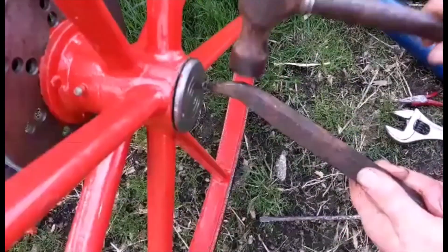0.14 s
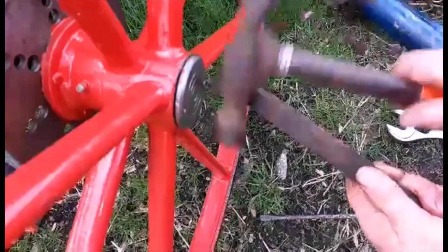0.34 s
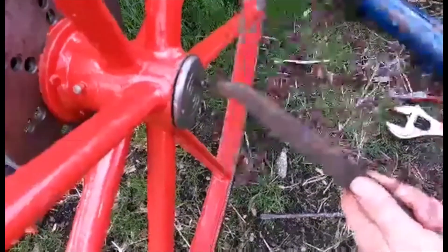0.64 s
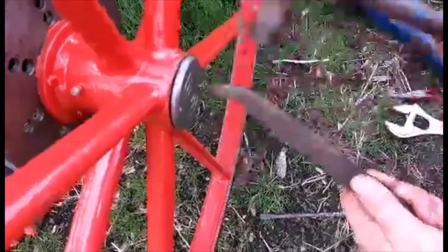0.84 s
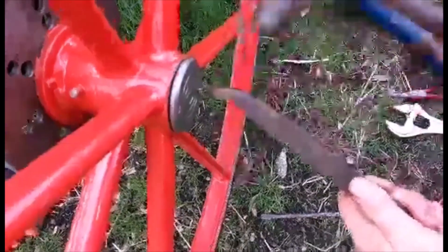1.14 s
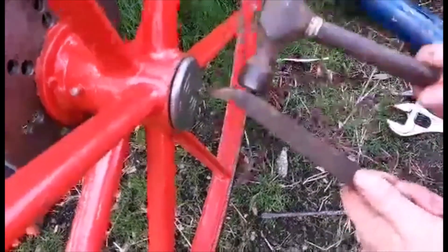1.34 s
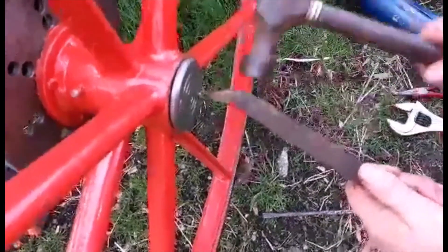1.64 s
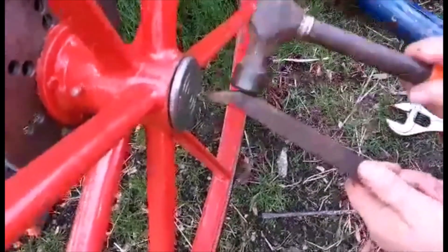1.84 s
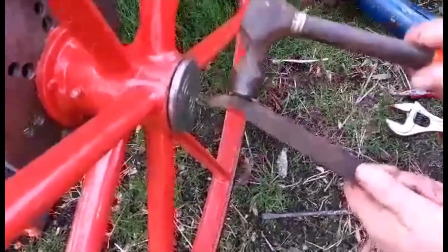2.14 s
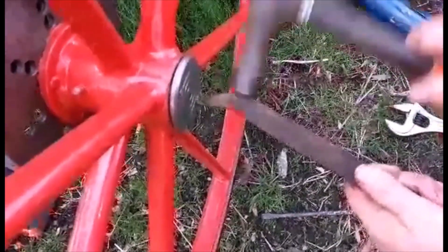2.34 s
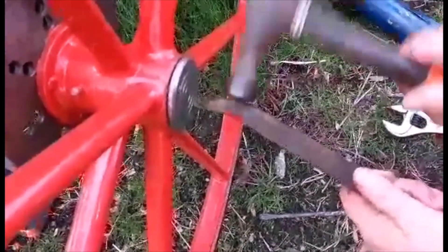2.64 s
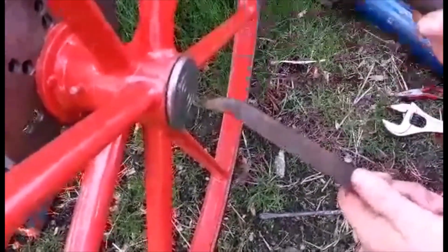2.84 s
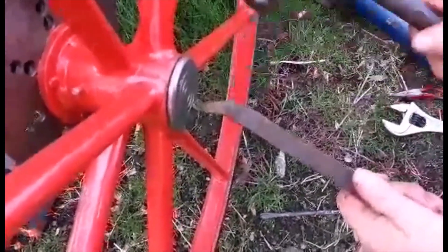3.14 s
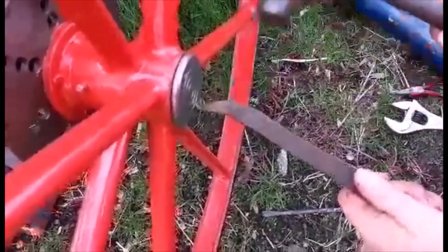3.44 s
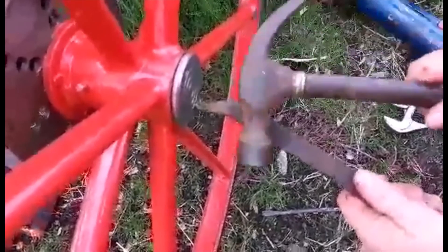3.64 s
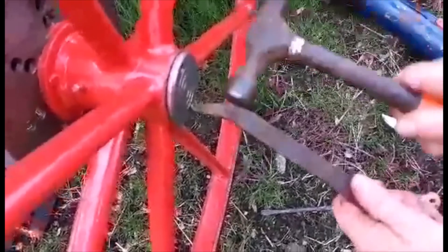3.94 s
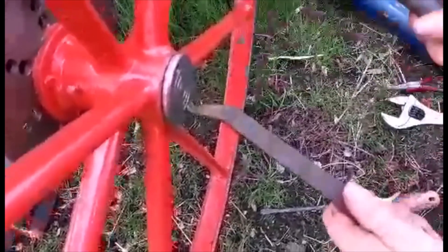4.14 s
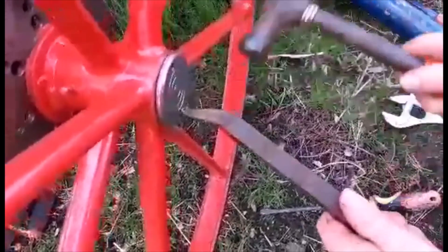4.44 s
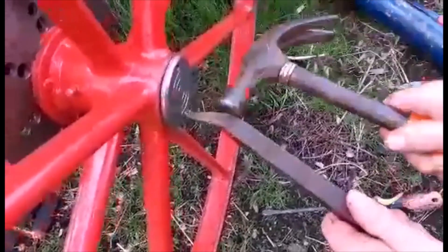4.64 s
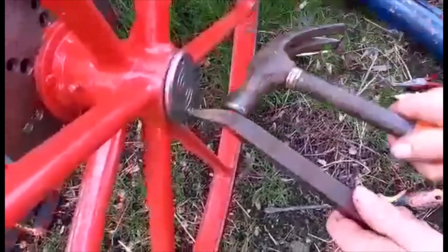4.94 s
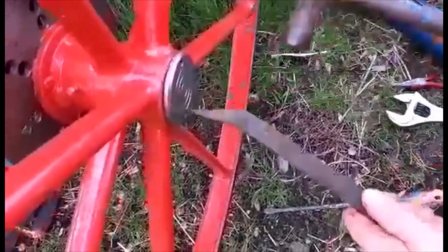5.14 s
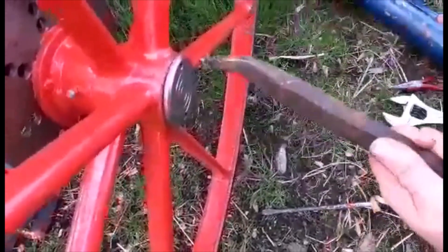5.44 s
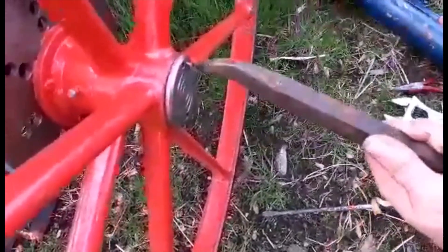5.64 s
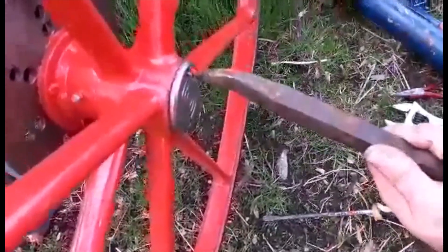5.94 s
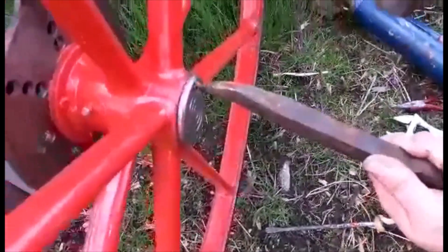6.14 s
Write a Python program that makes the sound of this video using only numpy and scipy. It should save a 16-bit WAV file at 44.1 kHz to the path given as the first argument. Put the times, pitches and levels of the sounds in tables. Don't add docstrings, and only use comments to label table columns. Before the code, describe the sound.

Outdoors and close up, a hammer hits a steel bar held against an iron wheel's cap. The first blow falls at 0.1 s, with a scratchy tick just after, and low wind puffs from 0.2 to 0.4. From 0.5 s the blows run steadily, about 0.27 s apart, to 3.3, then about 0.3 to 0.4 s apart until 4.7. Each is a hard, bright crack with a clangy ring around 4 kHz, a dense cap rattle, a brief wheel hum and usually a soft thump, dying within a tenth of a second or so. Wind bumps the microphone at 2.3. Faint ticks and slips fall between blows, more after 3.2. From 4.9 hammering pauses: wind thumps at 5.2, thin clinks and scratches at 5.3 to 5.85, then strong buffeting, nearly overloading, around 6.1. A final loud clank with a loose clink lands at 6.24. Soft airy hiss lies beneath.

```python
import sys
import numpy as np
from scipy import signal
from scipy.fft import rfft, irfft, next_fast_len
from scipy.io import wavfile
from scipy.ndimage import uniform_filter1d, map_coordinates

SR = 44100
rng = np.random.default_rng(int(sys.argv[2]) if len(sys.argv) > 2 else 0)


def ratio(d):
    e = np.asarray(d, float) / 20
    return 10 ** e


def int16_out(signal):
    q = np.round(np.clip(np.atleast_2d(signal).T, -1, 1) * 32767)
    wavfile.write(sys.argv[1], SR, q.astype(np.int16))


N = 276948

# (time [s], bar ring [dB], lean to the upper of the bar's twin modes [dB], # thump [dB], level
# near 9.6 kHz [dB])
BLOWS = [(0.0786, 2.5, -19, -51.5, -1.5), (0.4909, 0.5, 4, -28, -6), (0.7635, 0, 7.5, -27, -2),
         (1.036, -1.5, -4, -26, -1.5), (1.3, 0, -2, -37, -7), (1.571, -1.5, -10.5, -29.5, 3.5),
         (1.8347, 0, -10, -20.5, -2.5), (2.1146, 1, 1.5, -22, -7), (2.412, -0.5, -2, -29, -2),
         (2.6934, -0.5, -3.5, -24.5, 0.5), (2.981, 1.5, -0.5, -36.5, 0.5), (3.3095, 3.5, 4.5, -69, -20),
         (3.705, 1.5, -0.5, -26.5, -1.5), (4.0426, 0, -10.5, -25, 0), (4.359, 2, 1, -25.5, -1),
         (4.6672, .5, -16, -26, 4.5), (6.242, 1, 5, -29.5, 4.5)]
# (time [s], peak level [dB], frequency [Hz])
GUSTS = [(0.222, -16, 102), (0.243, -20, 237), (0.277, -25, 463), (0.293, -17.5, 156), (0.387, -17, 258),
         (2.233, -16, 175), (2.259, -11, 205), (2.288, -11.5, 493), (2.323, -10.5, 102),
         (2.353, -19.5, 118), (4.919, -34, 120.7), (5.155, -27.5, 248), (5.168, -8.5, 332),
         (5.195, -18, 344), (5.272, -22, 167), (5.281, -13, 327), (5.3, -19.5, 304), (5.463, -20, 276),
         (5.725, -23.5, 102), (5.955, -16.5, 260), (6.048, -12.5, 245), (6.069, -12, 258),
         (6.112, -5.5, 293), (6.139, -12, 393), (6.146, -7, 430), (6.156, 5, 425), (6.167, -10, 250),
         (6.178, -13.5, 260), (6.191, -6, 301), (6.269, -11.5, 324.5)]
WHEEL_DB = -21


def unit(x):
    return x / np.sqrt(np.mean(x ** 2) + 1e-20)


def along(points, hz):
    f, v = np.transpose(points)
    return np.interp(np.log(hz + 1), np.log(f + 1), v)


def shaped(x, spectrum):
    size = next_fast_len(x.shape[-1] + 4096)
    gain = ratio(along(spectrum, np.fft.rfftfreq(size, 1 / SR)))
    return irfft(rfft(x, size) * gain, size)[..., :x.shape[-1]]


def coloured(x, spectrum):
    return unit(shaped(x, spectrum))


def wobble(rate):
    knots = rng.standard_normal(int(N * 400 / SR) + 4)
    return map_coordinates(knots, [np.arange(N) * min(rate, 400) / SR])


def patches(shape, bins, frames):
    field = uniform_filter1d(rng.standard_normal(shape), size=bins, axis=-2)
    return unit(uniform_filter1d(field, size=frames, axis=-1))


def add(track, s, sound):
    i = max(round(s * SR), 0)
    track[i:i + len(sound)] += sound


def hiss():
    # (time [s], level [dB])
    breeze = [(0, -65), (0.451, -60.5), (.75, -67), (1.7, -64.5), (2.31, -62), (3.04, -69), (3.2, -62),
              (3.48, -67), (3.999, -63), (4.9, -61), (5.389, -66), (6.14, -60.5), (6.28, -66)]
    # (frequency [Hz], level [dB per Hz])
    hiss_colour = [(30, -31.5), (60, -1.5), (150, -1.5), (500, -11), (1100, -16.5), (2000, -11.5),
                   (3000, -16), (4500, -16.5), (7000, -21), (9300, -29), (12000, -21), (13800, -23)]
    z = signal.stft(rng.standard_normal((2, N)), nperseg=512)[2]
    rustle = ratio(3 * patches(z.shape[1:], bins=6, frames=5))
    air = signal.istft(z * rustle, nperseg=512)[1][:, :N]
    s, air_db = np.transpose(breeze)
    level_db = np.interp(np.arange(N) / SR, s, air_db) + 6 + 0.67 * wobble(22)
    return ratio(level_db) * coloured(air, hiss_colour)


def swells(now):
    # (crest time [s], crest level [dB], rise per 20 dB [s], fall per 20 dB [s],
    # flutter over the rumble [dB])
    swell_table = [(0.241, -43.5, 0.12, 0.26, 2.5), (0.299, -38, 0.13, -0.04, 2),
                   (.4, -40.5, 0.078, 0.1935, -9.5), (0.699, -68.5, .3, 1.5, -6.5),
                   (1.92, -67, .15, -0.2, -0.5), (2.29, -36.5, .14, 0.22, -2), (2.39, -41, 0.18, 0.05, 2.5),
                   (2.64, -51, .5, 0.22, -17.5), (3.24, -71, 0.14, .5, 9.5), (3.9, -75, 0.39, 0.84, 0),
                   (4.269, -61.5, 0.28, 0.76, 2), (5.142, -38.5, 0.078, .4, 3.5),
                   (5.278, -42.5, 0.13, 0.22, 8), (5.45, -41, 0.21, -0.04, -3), (5.63, -62, .2, -5, -22),
                   (5.77, -53, .06, .3, -10), (5.96, -41, 0.41, 1, -3.5), (6.05, -34, 0.027, -0.2, -1),
                   (6.14, -34, 0.075, 0.25, 7), (6.27, -45, .1, .3, 7)]
    calm_db, flutter_narrow = -86, 1.486
    s, db, rise, fall, flutter_db = np.transpose(swell_table)[..., None]
    coarse = now[::64]
    distance = np.where(coarse < s, (s - coarse) / np.abs(rise), (coarse - s) / np.abs(fall))
    down_db = -20 * distance
    gains = ratio(db + down_db), ratio(db + flutter_db + flutter_narrow * down_db)
    totals = [np.sqrt(ratio(2 * calm_db) + np.sum(g ** 2, axis=0)) for g in gains]
    return [np.interp(now, coarse, total) for total in totals]


def tearing(now):
    calm_db, edge_db, slap_share = -75, -50, 0.99
    db_per_octave, edge_s = 14, 0.02
    s, db, hz = np.transpose(GUSTS)[..., None]
    coarse = now[::64]
    peak_db = edge_db + slap_share * db + db_per_octave * np.log2(hz / 300)
    burst = ratio(peak_db) * np.exp(-np.abs(coarse - s) / edge_s)
    return np.interp(now, coarse, ratio(calm_db) + burst.sum(axis=0))


def slaps():
    out = np.zeros((2, N + SR))
    t = np.arange(-SR // 40, SR // 40) / SR
    for at, db, hz in GUSTS:
        for port in out:
            late, phase = rng.standard_normal(2)
            u = (t - 0.0008 * late) * hz - .8
            bump = np.exp(-(u / 0.42) ** 2 / np.sqrt(.02 + np.abs(u / 0.41)))
            pulse = bump * np.cos(2 * np.pi * (u + 0.12 * phase))
            add(port, at + t[0], ratio(db + 0.5) * pulse)
    return shaped(out[:, :N], [(20, -15), (55, 0)])


def wind():
    # (frequency [Hz], level [dB])
    rumble_colour = [(20, -48), (40, -12), (65, -0.5), (150, -1), (260, -2.5), (500, -16), (900, -90)]
    # (frequency [Hz], level [dB])
    flutter_colour = [(100, -57), (220, -19.5), (380, -3), (700, -12.5), (1100, -24), (1800, -39.5),
                      (4000, -102.5)]
    # (frequency [Hz], level [dB])
    edge_colour = [(300, -41), (700, -1.5), (1100, -6.5), (1700, -14), (2300, -25.5), (4000, -63)]
    now = np.arange(N) / SR
    rumble_gain, flutter_gain = swells(now)
    eddy = wobble(35)
    lumps = ratio(3.5 * eddy + 1.5 * np.array([wobble(25), wobble(25)]))
    spike_db = 2.5 * eddy + 4 * wobble(150) + 4.5 * np.array([wobble(140), wobble(140)])
    push = ratio(np.clip(spike_db, None, 13)) * rng.standard_normal((2, N))
    rumble = ratio(11.5) * coloured(lumps * rng.standard_normal((2, N)), rumble_colour)
    flutter = ratio(9.5) * coloured(push, flutter_colour)
    edge = ratio(3.5) * coloured(push, edge_colour)
    return rumble_gain * rumble + flutter_gain * flutter + tearing(now) * edge + slaps()


def ports(x):
    # (frequency [Hz], spread [radians])
    scatter = [(60, 0.095), (250, 0.68), (800, 1.59), (13000, 1.25)]
    hz, _, z = signal.stft(x, SR, nperseg=256)
    field = uniform_filter1d(rng.standard_normal(z.shape), size=5, axis=0)
    field = uniform_filter1d(field, size=40, axis=1)
    drift = unit(uniform_filter1d(field, size=3, axis=0))
    turn = np.exp(1j * along(scatter, hz)[:, None] * drift)
    return signal.istft(np.array([z * turn, z / turn]), SR, nperseg=256)[1][:, :N]


def ring(modes, t, spread_db, slack, blur):
    hz, db, t60 = np.transpose(modes)[..., None]
    luck = rng.standard_normal((2, len(modes), 1))
    steps = rng.standard_normal((len(modes), len(t)))
    wander = np.cumsum(steps, axis=1) * blur / np.sqrt(SR)
    level_db = db + spread_db * luck[0] - 60 * t / np.clip(t60, .02, .45)
    phase = 2 * np.pi * (hz * (1 + slack * luck[1]) * t + wander)
    return np.sum(ratio(level_db) * np.sin(phase), axis=0)


def rattle(t, t60, tail_db):
    # (frequency [Hz], multiple of the t60)
    linger = [(200, 1.8), (1000, 1.3), (4000, 1.05), (12000, .8)]
    # (frequency [Hz], level [dB per Hz])
    rattle_colour = [(88, -33.5), (150, -23.5), (656, -12), (1480, -8), (2080, -12), (4270, -10),
                     (5460, -14), (6470, -9.5), (8760, -16), (12100, -12.5), (13800, -14.5)]
    hz, when, z = signal.stft(rng.standard_normal(len(t)), SR, nperseg=128)
    life = t60 * along(linger, hz)[:, None]
    colour = ratio(along(rattle_colour, hz))[:, None]
    colour = colour / np.sqrt(np.mean(colour ** 2))
    fall = ratio(-60 * when / life) + ratio(tail_db - 60 * when / (3.04 * life))
    grain = ratio(1.8 * patches(z.shape, bins=2, frames=5))
    return signal.istft(z * grain * fall * colour, SR, nperseg=128)[1][:len(t)]


def ticks(lead=.001):
    # (time [s], peak level [dB], tilt to the treble [dB], t60 [s])
    slips = [(0.1372, -6, 12, 0.035), (0.1505, -13.5, -5, 0.046), (0.3195, -30.5, -19, 0.027),
             (0.3642, -19.5, -1.5, 0.05), (0.638, -38.5, -21.5, .13), (1.333, -17.5, 3.5, .035),
             (2.642, -44, -7, 0.18), (3.216, -30.5, -12, 0.051), (3.2269, -17.5, -0.5, 0.056),
             (3.3192, -4.5, 4, 0.0137), (3.8365, -23.5, -5.5, 0.08), (4.1156, -27, 7, 0.075),
             (4.127, -34, -7.5, .066), (4.1634, -36, 4, 0.046), (4.2505, -19, 8, 0.021),
             (4.2622, -43, 7, .044), (4.2788, -38.5, 12, 0.051), (4.4693, -38.5, -1, 0.063),
             (4.517, -33, -18, 0.074), (4.6293, -34.5, -5.5, 0.12), (4.9367, -43, -4, 0.054),
             (4.9546, -32, 23.5, 0.022), (5.032, -43, -7, 0.22), (5.121, -29.5, -14, 0.023),
             (5.51, -39.5, 3.5, 0.067), (5.8144, -36, 3, 0.063), (5.8325, -28, -12, .018),
             (5.8489, -17.5, 2.5, 0.06), (5.9723, -34, 4.5, 0.054), (6.2324, -15.5, 3, 0.41)]
    # (time [s], peak level [dB], scratch level [dB], share of the free ring time [0-1])
    clinks = [
        (5.331, -32, -10, 1),
        (5.4026, -49, -8.5, 1),
        (5.6667, -29, -3.5, 0.846),
        (5.714, -33, -1.5, 0.45),
        (6.2461, -10, -10, 1),
    ]
    # (frequency [Hz], level [dB], t60 [s])
    free_bar = [(2200, -2, .12), (2330, -9, .08), (3970, -2, .06), (4120, -2, .06), (4760, -3, .11),
                (6540, -9, .09), (8290, -10, .1), (11650, -12, .07)]
    out, t = np.zeros(N + SR), np.arange(SR // 6) / SR
    rise = np.clip(t / lead, 0, 1)
    for s, db, tilt_db, t60 in slips:
        low_db = -15 - 0.41 * tilt_db
        treble_db = -17 + 0.43 * tilt_db
        colour = [(60, -68.0), (200, low_db - 14.5), (500, low_db + 11.5), (1700, low_db + 7.5),
                  (2200, 2.0), (8500, -3.5), (9300, treble_db + 11)]
        scratch = shaped(rise * rattle(t, t60, -28.5), colour)
        add(out, s - lead / 2, ratio(db - 3.5) * scratch)
    for s, db, scratch_db, free in clinks:
        damping = ratio(-600 * t * (1 / np.clip(free, .3, 1) - 1))
        bar = damping * ring(free_bar, t, 1.5, .002, blur=1)
        scratch = ratio(scratch_db) * rattle(t, 0.0465, -29.5)
        add(out, s - lead / 2, ratio(db - 2.5) * rise * (bar + scratch))
    return out[:N]


def blow_colour(ring_db, lean_db, wheel_db, upper_band_db):
    # (frequency [Hz], level [dB])
    steel_colour = [(50, -75.5), (140, -27.5), (300, -1.5), (1500, -8), (2300, -4), (6700, -3),
                    (8400, -7.5), (11000, -1)]
    twin_hz, twin_width, upper_db = (4380, 4600), 0.1, 4
    cap_share = 0.31
    low_hz, low_lean = 2300, .45
    upper_band_hz, upper_band_width, top_share = 9600, .07, .15
    hz = np.geomspace(40, 16000, num=160)

    def near(centre, width):
        return np.exp(-(np.log(hz / centre) / width) ** 2 / 2)

    lower, upper = (near(centre, twin_width) for centre in twin_hz)
    db = along(steel_colour, hz) + cap_share * ring_db
    db += (ring_db - lean_db / 2) * lower
    db += (ring_db + upper_db + lean_db / 2) * upper
    db += low_lean * lean_db * near(low_hz, 0.05)
    db += (wheel_db - WHEEL_DB) * (hz < 1600)
    db += upper_band_db * np.maximum(near(upper_band_hz, upper_band_width), top_share * (hz > upper_band_hz))
    return np.transpose([hz, db])


def hammer(lead=0.0044):
    # (frequency [Hz], level [dB], t60 [s])
    bar_modes = [(2280, -5, .1), (3225, -8, .08), (4010, -2, .08), (4270, 0, .08), (4500, -3, .07),
                 (4900, -7, .05), (6370, -5, .09), (6620, -7, .07), (7250, -10, .05), (8295, -4, .12),
                 (9220, -9, .08), (10020, -7, .1), (11690, -4, .08), (12300, -10, .05)]
    # (frequency [Hz], level [dB], t60 [s])
    wheel_modes = [(303, -14, 0.28), (530.6, -20, 0.5), (625, -17, 0.3), (385.2, -4.5, 0.05),
                   (811, -1, 0.018), (953, -9.5, 0.059), (1409.1, -4, 0.081), (1498, -9, 0.074),
                   (2007, -27, 0.092)]
    firm_db, wheel_share = -26.5, 0.1
    out, t = np.zeros(N + SR), np.arange(SR // 3) / SR
    after = np.clip(t - lead, 0, None)
    rise = ratio(-5000 * np.clip(lead - t, 0, None) - 14 * (t < lead))
    for s, ring_db, lean_db, thump_db, upper_band_db in BLOWS:
        bar = ratio(-12) * ring(bar_modes, t, 2, .005, blur=2.2)
        second_s = .011 + 0.0061 * rng.standard_normal()
        chatter = 1 + 0.23 * np.exp(-((after - second_s) / 0.00025) ** 2)
        cap = ratio(-4.0) * chatter * rattle(t, 0.05, -8.0)
        crack = ratio(7.5) * rattle(t, 0.023, -55.5) * (t >= lead)
        wheel_db = WHEEL_DB + wheel_share * (thump_db - firm_db)
        colour = blow_colour(ring_db, lean_db, wheel_db, upper_band_db)
        take_up = 1 - np.exp(-after / .001)
        wheel = ratio(wheel_db + 6) * ring(wheel_modes, after, 1.5, .005, blur=1.4) * take_up
        swing = np.sin(2 * np.pi * (52 * after + 1.0 * (1 - np.exp(-after / 0.0049))))
        thump = ratio(thump_db + 5) * swing * np.exp(-(after / .021) ** 1.5)
        add(out, s - lead, shaped(rise * (bar + cap + crack), colour) + wheel + thump)
    return out[:N]


def scene():
    now = np.arange(N) / SR
    duck_db = sum(-20 * np.exp(-((now - blow[0] + .0075) / .004) ** 4) for blow in BLOWS)
    background = ratio(duck_db) * hiss() + ratio(0.31 * duck_db) * wind()
    steel = ratio(-3.0) * ports(hammer() + ticks())
    return background + steel


def roll_off(x):
    return signal.sosfilt(signal.butter(12, 13980, fs=SR, output="sos"), x)


def record(dry):
    mix = dry / (1 + np.abs(dry / .95) ** 4) ** (1 / 4)
    return roll_off(mix)


dry = scene()
out = record(dry)
int16_out(out)
```